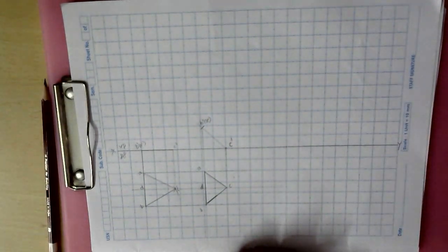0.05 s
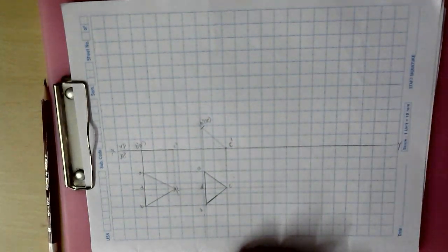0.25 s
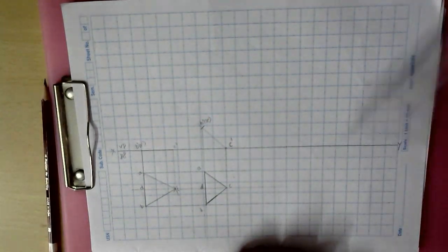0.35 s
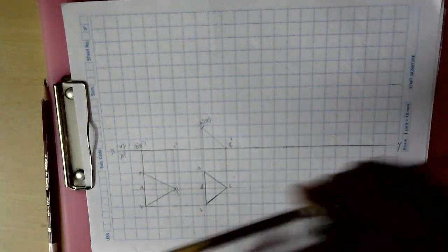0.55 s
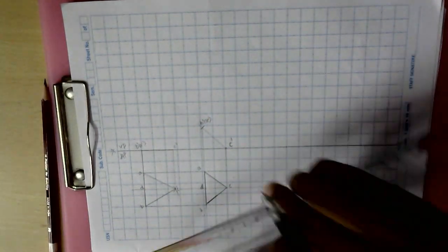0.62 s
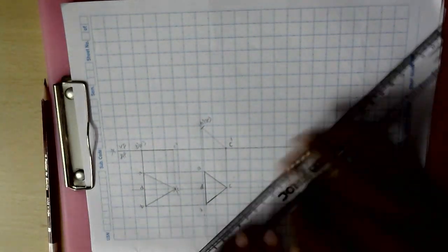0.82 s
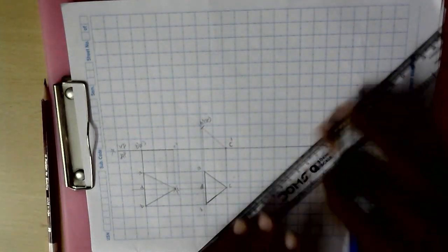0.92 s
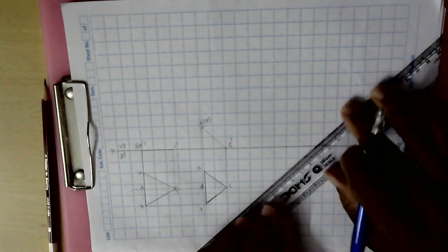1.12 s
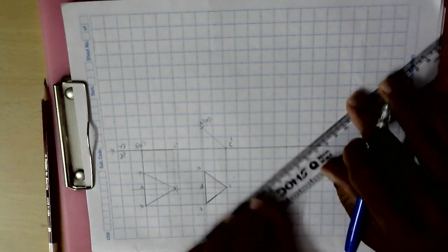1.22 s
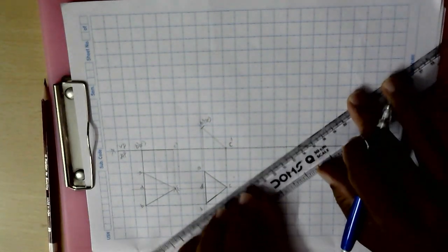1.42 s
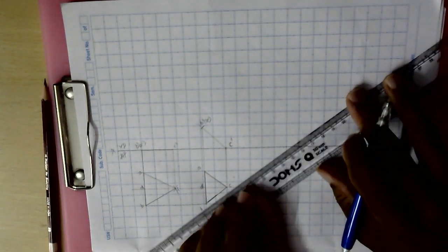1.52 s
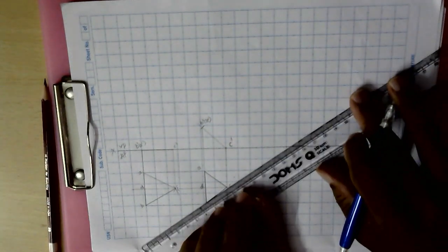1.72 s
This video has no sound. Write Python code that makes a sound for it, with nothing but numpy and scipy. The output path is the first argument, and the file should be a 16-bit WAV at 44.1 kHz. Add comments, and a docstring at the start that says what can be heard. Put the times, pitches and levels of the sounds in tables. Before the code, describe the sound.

A plastic ruler clatters against a clipboard, then slides softly over paper.

```python
"""A faint rustle on paper and a small metal tick, then a plastic ruler is snatched off a clipboard.
It clatters in the hand, is laid back on the paper and slides softly into place. The board knocks and
the ruler clacks, each a burst of dense vibration plus a few ringing modes, and the board's metal clip
chatters. A small, droning room answers each blow; the loudest just overload the close microphone."""
import sys
import numpy as np
from scipy import signal
from scipy.fft import rfft, irfft
from scipy.io import wavfile

SR = 44100
rng = np.random.default_rng(int(sys.argv[2]) if len(sys.argv) > 2 else 0)


def log_audio(samples):
    """Write samples as a 16-bit WAV file to the path given in sys.argv[1]."""
    # one column per channel
    frames = np.atleast_2d(samples).T
    # limit to full scale, then quantise
    limited = np.clip(frames, -1, 1)
    pcm = np.round(limited * 32767).astype(np.int16)
    wavfile.write(sys.argv[1], SR, pcm)


N = 77175


def amp(db):
    """Decibels to gain."""
    return 10 ** (np.asarray(db) / 20)


def unit(x):
    """Scales to energy 1."""
    return x / np.sqrt(np.sum(x ** 2) + 1e-20)


def curve_at(points, hz):
    """Reads a breakpoint curve on a log-frequency axis."""
    point_hz, value = np.transpose(points)
    return np.interp(np.log(hz + 1), np.log(point_hz + 1), value)


def bell(hz, centre_hz, octaves):
    """An EQ bell of height 1 over log frequency."""
    return np.exp(-.5 * (np.log2(hz / centre_hz) / octaves) ** 2)


def add(mix, start, sound):
    """Mixes a sound in at a start time in seconds."""
    part = mix[max(round(start * SR), 0):][:len(sound)]
    part += sound[:len(part)]


def equalise(x, gain_db, size=4096):
    """Minimum-phase EQ whose gain in dB is a function of frequency."""
    hz = abs(np.fft.fftfreq(size, 1 / SR)) + 1
    log_gain = np.log(amp(np.maximum(gain_db(hz), -100)))
    response = np.exp(np.conj(signal.hilbert(log_gain)))
    taps = np.fft.ifft(response).real[:size // 2]
    return signal.fftconvolve(x, taps)[:len(x)]


def crack(t60, size=4096):
    """The attack of a blow: countless modes of about equal strength, dying together."""
    fade = amp(-60 * np.arange(size) / SR / t60)
    spectrum = rfft(rng.standard_normal(size) * fade, 2 * size)
    flat_burst = irfft(spectrum / (abs(spectrum) + 1e-12))[:size]
    return unit(flat_burst * fade ** .25)


def rings(modes, count, size=12288, rise_s=0.00048):
    """The ring-out of distinct modes, with fresh phases for each of count blows."""
    t = np.arange(size) / SR
    waves = np.array([amp(db - 60 * t / t60) * np.exp(2j * np.pi * hz * t) for hz, db, t60 in modes])
    phases = np.exp(2j * np.pi * rng.random((count, len(modes))))
    attack = np.minimum(t / rise_s, 1)
    return [unit(wave * attack) for wave in (phases @ waves).real]


# The noise bed's tone. Each row: frequency in Hz, relative level in dB.
AIR_SPECTRUM = [(20, -2.5), (35, -9), (50, -0.5), (70, -7.5), (130, -7.5), (200, -2), (400, -3.5),
                (650, -5.5), (1000, -8.5), (1500, -14), (2500, -21.5), (5500, -26), (9000, -37.5),
                (15500, -40.5)]
# The room's droning resonances. Each row: centre in Hz, width in Hz, level in dB.
AIR_DRONES = [(105.4, 14, -71), (182, 30, -65), (290.5, 18, -61), (440, 100, -57.5), (589, 40, -61.5)]
def room_tone(bed_db=-51):
    """A steady bed of room noise with a few low resonances."""
    hz = np.fft.rfftfreq(N, 1 / SR)
    layers = [(amp(curve_at(AIR_SPECTRUM, hz)), bed_db)]
    layers += [(1 / (1 + (2 * (hz - centre) / width) ** 2), db) for centre, width, db in AIR_DRONES]
    out = np.zeros(N)
    for shape, db in layers:
        noise = irfft(rfft(rng.standard_normal(N)) * shape, N)
        out += amp(db) * unit(noise)
    return np.sqrt(N) * out


# The fader ride of the sliding. Each row: time in seconds, level in dB.
SLIDE_LEVELS = [(0, -60), (0.12, -59), (0.167, -52), (0.215, -50), (0.30, -40), (0.35, -52.5), (0.419, -50),
                (0.74, -83.5), (0.765, -55), (0.81, -52), (0.83, -53), (0.86, -70), (1.17, -69),
                (1.23, -54), (1.32, -50.5), (1.426, -59.5), (1.494, -53), (1.546, -60.5), (1.603, -56),
                (1.75, -66)]
# The tone of rubbed paper. Each row: frequency in Hz, relative level in dB.
PAPER_SPECTRUM = [(200, -17), (600, 0.5), (1400, -0.5), (2200, -5.5), (3000, -2), (3700, -2.5), (4700, 1.5),
                  (6000, -3.5), (7400, 0.5), (8400, -8.5), (9500, -20), (15000, -33.5)]
def sliding(slips_per_s=5700):
    """Tiny slips of plastic and hand over paper fibres blur into a rustle."""
    slips = (rng.random(N) < slips_per_s / SR) * rng.standard_normal(N)
    rustle = np.sqrt(N) * unit(equalise(slips, lambda hz: curve_at(PAPER_SPECTRUM, hz)))
    level_db = np.interp(np.arange(N) / SR, *np.transpose(SLIDE_LEVELS))
    return amp(level_db) * rustle


# The metal clip's bounces. Each row: start in seconds, level in dB.
CLIP_BOUNCES = [(0.074, -18), (0.2413, -5.5), (0.2489, -7), (0.2562, -7), (0.272, -16)]
# Its ping. Each row: frequency in Hz, relative level in dB, seconds to fall 60 dB.
CLIP_PARTIALS = [(4700, 0, .045), (4790, -7, .025), (7430, -6, .04), (7650, -12, .02)]
def metal_clip():
    """The shaken clip bounces with short, thin pings."""
    out = np.zeros(N)
    for (start, db), ping in zip(CLIP_BOUNCES, rings(CLIP_PARTIALS, len(CLIP_BOUNCES))):
        add(out, start, amp(db) * ping)
    return out


# The broad tone of a clack. Each row: frequency in Hz, relative level in dB.
RULER_SPECTRUM = [(100, -16.5), (400, -10), (1300, -6.5), (2300, -9.5), (4000, -4.5), (5400, -1.5),
                  (7500, -2.5), (9000, -10.5), (11500, -23), (15500, -39.5)]
# Peaks and dips from clustered modes. Each row: centre in Hz, half-width in Hz, gain in dB.
MODE_CLUSTERS = [(1302, 110, 12.5), (2768, 140, 5.5), (3204, 86, 9.5), (3450, 99, -6.5), (4050, 290, 6.5),
                 (4860, 71, 3), (5360, 190, 7), (5870, 84, -4), (6700, 220, 6), (7360, 60, -4),
                 (7530, 70, 0.5), (8760, 80, 4), (8740, 108, -1.5), (9350, 94, 5.5), (10100, 90, 3)]
def plastic_db(hz):
    """How strongly the ruler radiates at each frequency."""
    clusters = sum(db / (1 + ((hz - centre) / width) ** 2) for centre, width, db in MODE_CLUSTERS)
    return curve_at(RULER_SPECTRUM, hz) + clusters


# The ruler's hits. Each row: start in seconds, level in dB, EQ bell centre in Hz, bell gain in dB,
# ring against snap in dB before the trim.
RULER_HITS = [(0.159, -21, 7050, 4, 13), (0.178, -21.5, 9000, 13, 4), (0.294, -20, 8800, 17, 3),
              (0.369, -6.5, 6400, 1, -5), (0.374, -5.5, 7500, 2.5, 7), (0.4285, 9, 5000, 12, 3),
              (0.4322, 11, 5560, 6.5, 5), (0.434, 11, 6000, 6, 2.5), (0.4394, 5, 6070, -8, -21.5),
              (0.442, 7.5, 8260, 9, 2.5), (0.4486, 9.5, 3860, 9, -12), (0.4530, 4.5, 7500, -10, -14),
              (0.469, -12, 5540, -5, 1), (0.4947, -2, 5900, 0.5, 6), (0.504, -3.5, 5560, 4.5, -12),
              (0.5111, -6.5, 9100, 7, -13), (0.531, -13, 3200, 9.5, -9), (0.639, -19, 9000, 4, -1),
              (0.76, -26, 7000, 3, -8), (0.8392, -14, 2420, 8.5, -21), (0.8613, -1.5, 2800, 10, 0),
              (0.866, -1.5, 3040, 11.5, 4), (0.8764, -6, 6850, 14, 6), (0.885, -20, 3000, 7.5, -11.5),
              (0.892, -5, 4300, 18, 6), (0.8984, -3.5, 2800, 2, -12.5), (0.918, -11.5, 3000, 8, -10),
              (0.941, -14, 7800, 11, -11.5)]
# Its ring. Each row: frequency in Hz, relative level in dB, seconds to fall 60 dB.
RULER_PARTIALS = [(1283, -9, .19), (3185, -5, .29), (3710, -4, .13), (4025, -3, .13), (4500, -7, .15),
                  (4956, -7, .12), (5345, 2, .14), (6293, -5, .15), (6617, 0, .15), (6713, -3, .14),
                  (6913, -4, .17), (7310, -4, .15), (7603, 1, .15), (8641, -8, .15)]
def ruler(snap_t60=.028, ring_trim_db=-8):
    """Hard plastic clacks, a snap and a ring each, coloured by where the ruler is hit."""
    out = np.zeros(N)
    ring_outs = rings(RULER_PARTIALS, len(RULER_HITS))
    for (start, db, bell_hz, bell_db, ring_db), ring in zip(RULER_HITS, ring_outs):
        t60 = snap_t60 * 2 ** (0.08 * ring_db)  # a gripped ruler rings less and its snap dies sooner
        snap = equalise(crack(t60), lambda hz: plastic_db(hz) + bell_db * bell(hz, bell_hz, octaves=.26))
        add(out, start, amp(db) * unit(snap))
        add(out, start, amp(db + ring_db + ring_trim_db) * ring)
    return out


# Blows on the board. Each row: start in seconds, level in dB, treble cutoff in Hz, hollow boost in dB,
# ring against knock in dB before the trim.
BOARD_HITS = [(0.2311, 12, 4160, 4.5, 1), (0.2335, 12, 3050, 2.5, 2), (0.4296, 5, 2200, 10.5, -21),
              (0.4419, 2.5, 1900, 16, -10), (0.494, -9.5, 1680, -1, 7.5), (0.5135, -7, 1800, 1.5, -4),
              (0.8633, 3.5, 2760, -0.5, -5.5), (0.8655, -2.5, 3070, 9.5, -16), (0.867, 9, 1890, 11, -7),
              (0.8977, -10, 2000, 2.5, -13), (1.3098, -23, 3500, 5, 5.5), (1.486, -28.5, 2500, -2, 1)]
# The broad tone of a knock. Each row: frequency in Hz, relative level in dB.
BOARD_SPECTRUM = [(50, -34), (130, -25), (200, -8), (550, 1), (1050, -3), (1600, -0.5), (4000, 0.5),
                  (16000, 4.5)]
# The board's ring. Each row: frequency in Hz, relative level in dB, seconds to fall 60 dB.
BOARD_PARTIALS = [(95, -27, .35), (195, -11, .13), (289, -14, .15), (460, -7, .17), (556, 0, .165),
                  (738, -10, .11), (845, -2, .09), (1470, -1, .14), (1692, -4, .13), (2050, -6, .12),
                  (2549, -5, .11), (3100, -7, .1)]
def board(knock_t60=0.022, ring_trim_db=-7):
    """Knocks on the clipboard; a softer contact cuts the treble."""
    out = np.zeros(N)
    ring_outs = rings(BOARD_PARTIALS, len(BOARD_HITS))
    for (start, db, cutoff_hz, hollow_db, ring_db), ring in zip(BOARD_HITS, ring_outs):
        def tone_db(hz):
            # The hollower the knock, the less of the board's low body it stirs.
            hollow = bell(hz, 1335, octaves=.29) - .45 * bell(hz, 520, octaves=.7)
            treble_cut_db = 10 * np.log10(1 + (hz / cutoff_hz) ** 12)
            return curve_at(BOARD_SPECTRUM, hz) + hollow_db * hollow - treble_cut_db
        knock = equalise(crack(knock_t60), tone_db)
        add(out, start, amp(db) * unit(knock))
        add(out, start, amp(db + ring_db + ring_trim_db) * ring)
    return out


# Squeaky scuffs. Each row: start in seconds, length in seconds, centre in Hz, level in dB.
EDGE_SCUFFS = [(0.762, 0.028, 3100, -49), (0.796, 0.026, 7500, -44), (0.326, 0.024, 5100, -44)]
def scuffs(size=4096):
    """The ruler's edge catches and hisses in one narrow band."""
    out = np.zeros(N)
    t = np.arange(size) / SR
    for start, length, centre_hz, db in EDGE_SCUFFS:
        hiss = equalise(rng.standard_normal(size), lambda hz: 40 * bell(hz, centre_hz, octaves=.26))
        swell = np.sin(np.pi * np.minimum(t / length, 1))
        add(out, start, amp(db) * swell * np.sqrt(size) * unit(hiss))
    return out


# The reverb's decay. Each row: frequency in Hz, seconds to fall 60 dB.
REVERB_DECAY = [(150, 0.19), (500, 0.25), (1300, .33), (3000, 0.3), (7000, 0.34), (14000, 0.19)]
# The reverb's EQ. Each row: frequency in Hz, gain in dB.
REVERB_EQ = [(100, 10), (500, 4), (1400, -4.5), (3000, -4.5), (7000, -9.5), (14000, 1)]
def room_reverb(x, send_db=-7, predelay_s=.007):
    """The small room answers with a short diffuse tail, each band dying at its own speed."""
    hz, t, bands = signal.stft(rng.standard_normal(SR // 2), SR, nperseg=256)
    decay = amp(-60 * t / curve_at(REVERB_DECAY, hz)[:, None])
    tail = unit(signal.istft(bands * decay, SR, nperseg=256)[1])
    tail = equalise(tail, lambda hz: curve_at(REVERB_EQ, hz))
    out = np.zeros(N)
    add(out, predelay_s, signal.fftconvolve(x, tail))
    return amp(send_db) * out


def scene():
    """The mono mix: all the handling, its reverb and the room tone."""
    handling = board() + ruler() + metal_clip() + sliding() + scuffs()
    return (handling + room_reverb(handling) + room_tone())[None]


def record(dry):
    """The overloaded microphone rounds off the peaks; a low-pass then trims the very top."""
    ceiling, cutoff_hz = .78, 15700
    rounded = dry / (1 + (dry / ceiling) ** 8) ** (1 / 8)
    low_pass = signal.firwin(255, cutoff_hz, window=("kaiser", 9), fs=SR)
    return signal.oaconvolve(rounded, low_pass[None], "same")


dry = scene()
out = record(dry)
log_audio(out)
```